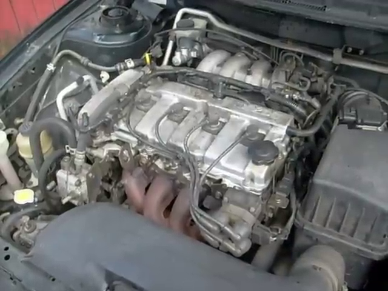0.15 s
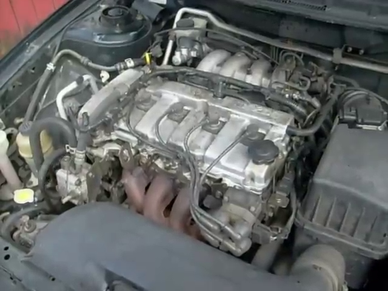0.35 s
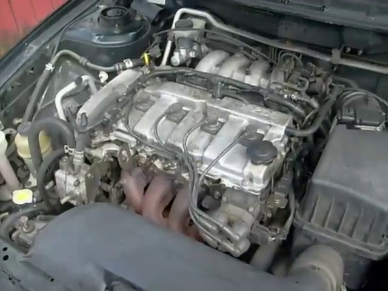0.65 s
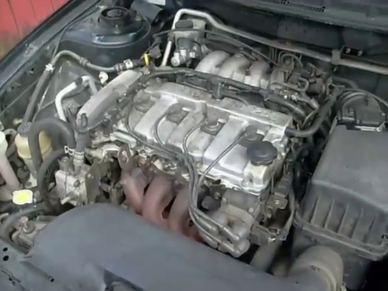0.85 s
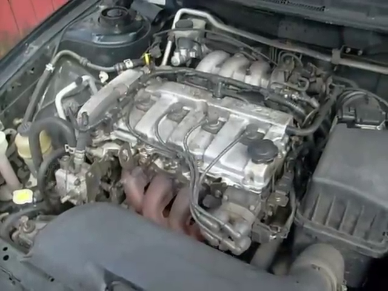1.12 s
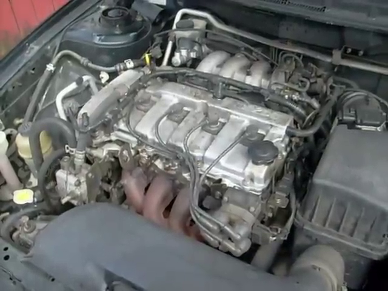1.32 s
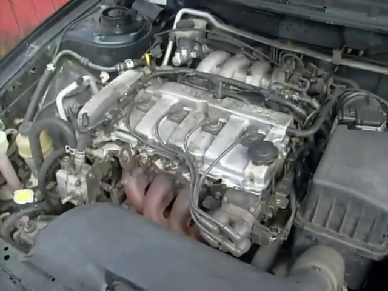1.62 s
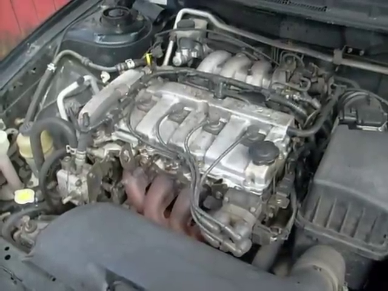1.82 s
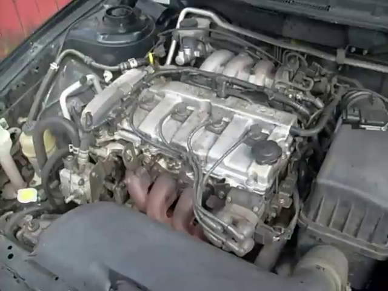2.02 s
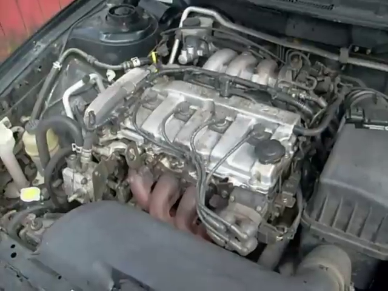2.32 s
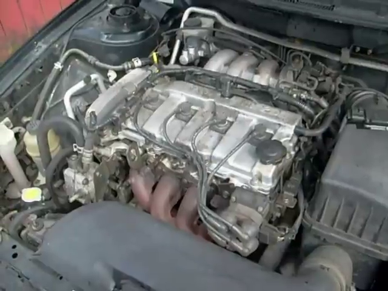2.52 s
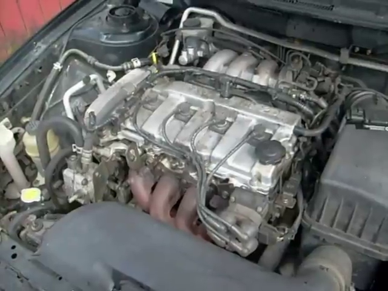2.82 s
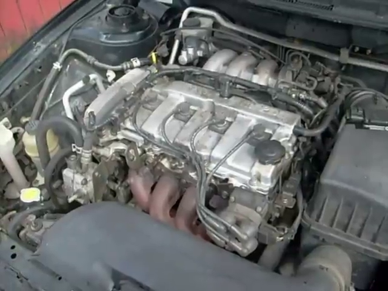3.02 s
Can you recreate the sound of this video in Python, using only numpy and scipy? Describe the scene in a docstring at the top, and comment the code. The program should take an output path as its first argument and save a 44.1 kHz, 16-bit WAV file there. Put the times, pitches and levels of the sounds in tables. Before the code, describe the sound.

A car engine cranks in six grinding pulses, catches with hard metallic knocking, then runs clattering.

```python
"""A starter motor grinds a car engine over six compression strokes in an open bay, close to the microphone.
Gear-tooth clicks ring its housing while the motor groans and the gears whine downward in pitch.
The engine catches with low booms, then blows and their rebounds ring the block as metallic knocks;
its rough clatter speeds up and eases to a fast idle, over firing tones.
Behind it all lie faint yard air and a pump's steady hum; the hardest blows overload the input."""
import sys
import numpy as np
from scipy import signal
from scipy.io import wavfile
from scipy.ndimage import uniform_filter1d

SR = 44100
rng = np.random.default_rng(int(sys.argv[2]) if len(sys.argv) > 2 else 0)


def put_to_file(sound):
    """Save the sound as 16-bit audio at rate SR, in the file named by the first command-line argument."""
    columns = np.atleast_2d(sound).T  # one column per channel
    safe = np.clip(columns, -1, 1)
    whole_steps = np.round(safe * 32767)
    wavfile.write(sys.argv[1], SR, whole_steps.astype(np.int16))


N = 138915  # length in samples

# Spectrum of the quiet yard's air. Each row: frequency in Hz, relative level in dB per Hz.
YARD_SPECTRUM = [(35, -45), (60, -34), (242, -7.5), (804, -19.5), (999, -9.5), (2390, -22), (3460, -10.5),
                 (4600, -38), (11000, -35), (14300, -70), (17000, -95.5)]
# Distant steady hum of a pump. Each row: frequency in Hz, level in dB rms.
PUMP_HUM = [(985.1, -61.5)]
# The starter's load on each compression stroke, with its groan. Each row: start in seconds, hold in seconds,
# drive level in dB, release in dB per second, groan in dB relative to the drive level, groan pitch in Hz.
STROKES = [(.29, 0.1, -16.5, 304, -11, 851), (.484, 0.073, -14.5, 287, -15.5, 866),
           (.667, 0.044, -14, 299, -18, 878), (.808, 0.051, -13, 340, -19, 884),
           (.954, 0.038, -13, 320, -12, 836), (1.094, 0.012, -11.5, 137, -21, 873)]
# Spectrum of the gear grind. Each row: frequency in Hz, relative level in dB per Hz.
GRIND_SPECTRUM = [(40, -46.5), (300, -21), (680, -19.5), (844, -8), (1400, -8.5), (1880, -5), (3190, 5),
                  (4270, -9.5), (5570, -17.5), (9960, -32.5), (13000, -61.5)]
# Resonances of the starter housing. Each row: frequency in Hz, width in Hz, relative level in dB.
HOUSING_MODES = [(2400, 68, -28), (3140, 94, -5), (3450, 28, -10), (4540, 62, -16.5)]
# Clanks of the pinion. Each row: start in seconds, drive level in dB.
CLANKS = [(0.2254, -23), (0.2356, -4), (0.248, -10.5), (0.2586, -9.5), (0.272, -16), (1.1925, -7)]
# Gear whine, sagging as each compression slows the motor.
# Each row: start in seconds, length in seconds, starting pitch in Hz, ending pitch in Hz, level in dB.
WHINES = [(.488, .095, 1640, 1190, -24), (.67, .065, 1830, 1350, -20), (.812, .062, 1830, 1320, -21),
          (.957, .062, 1830, 1370, -22), (1.097, .06, 1830, 1340, -24)]
# Engine speed. Each row: time in seconds, firings per second.
ENGINE_SPEED = [(1.25, 43), (1.35, 46.5), (1.47, 51), (1.6, 54.5), (1.72, 57), (1.95, 57.6), (2.08, 56.2),
                (2.2, 54.2), (2.6, 49.8), (3.0, 46.2), (3.15, 45.2)]
# Drive of the running clatter. Each row: time in seconds, level in dB.
CLATTER_LEVEL = [(1.2, -23), (1.634, -22.5), (3.15, -27.5)]
# Spectrum of the clatter. Each row: frequency in Hz, relative level in dB per Hz.
CLATTER_SPECTRUM = [(41, -84), (70, -29), (200, -21), (369, -20.5), (449, -14.5), (596, -18.5), (1080, -14),
                    (1230, -16.5), (1460, -5.5), (1590, -12), (2690, -4), (3350, 2), (4760, -20),
                    (10400, -36.5), (13000, -77)]
# Resonances of the open bay. Each row: frequency in Hz, width in Hz, relative level in dB.
BAY_MODES = [(1500, 15, -35), (3317, 290, 6.5)]
# Tone at the firing rate. Each row: time in seconds, level in dB rms.
FIRING_TONE = [(1.25, -67), (1.4, -53), (1.7, -51.5), (2.1, -52), (2.6, -57), (3.15, -64)]
# Further engine tones. Each entry: a multiple of the firing rate.
ORDERS = [2, 3, 4, 4.5, 5, 7.5, 9, 10.5]
# Their levels before wavering. Each entry: level in dB rms at 50 firings per second.
ORDER_LEVELS_DB = [-66, -58, -58, -64, -59, -57, -62, -63]
# Low booms as the first firings take. Each row: start in seconds, length in seconds, pitch in Hz, peak in dB rms.
BOOMS = [(1.27, .07, 182, -49), (1.325, .1, 245, -45)]
# Knocks and their rebounds. Each row: start in seconds, drive level in dB, relative drive of the low modes in dB.
KNOCKS = [(1.3485, -1.5, -3), (1.377, -3.5, -7), (1.4298, 3, -5), (1.4428, 0, -5.5), (1.483, -8.5, -11),
          (1.511, 5.5, -10), (1.5221, -4.5, -8), (1.532, -8.5, -1), (1.5876, 7, -12.5), (1.599, 0, -24),
          (1.6075, -2, -7), (1.615, 1, -13), (1.637, -10.5, -0.5), (1.6593, 9.5, -13), (1.6807, 3.5, -9.5),
          (1.6955, -9, -22), (1.729, 10, -15.5), (1.745, 1.5, -18), (1.7576, 1.5, -10), (1.767, -11, -6),
          (1.785, -24, 0), (1.8009, 8, -11), (1.8217, 0, -18), (1.837, -1, -13), (1.87, 8, -9.5),
          (1.8855, 0, -30), (1.8955, 2, -4.5), (1.908, -23, -4), (1.9387, 7, -5), (1.95, -17, -19),
          (1.962, 3.5, -20), (1.968, -7.5, -15), (1.978, -14, -3), (1.9917, -13, -9), (2.0092, 4, -2),
          (2.0232, 2.5, -12), (2.0372, 3, -9.5), (2.0866, -3.5, -6.5)]
# Ringing modes of the engine block. Each row: nominal pitch in Hz, nominal level in dB, 60 dB decay in seconds.
BLOCK_MODES = [(891, -14, .07), (1130, -9, .025), (1635, -3, .022), (1792, -2, .024), (1932, -1, .02),
               (2416, -2, .024), (2930, -12, .035), (3215, -3, .035), (3290, -2, .05), (3382, 1, .042),
               (3560, -5, .035)]
# Spectrum of the crack of each blow. Each row: frequency in Hz, relative level in dB per Hz.
CRACK_SPECTRUM = [(40, -43), (865, -0.5), (1270, 2), (1830, -10), (2830, 10), (3350, 5), (4380, -13),
                  (9960, -51.5), (13000, -39)]

ENGAGE_S, LET_GO_S = 0.2215, 1.1  # the starter begins and lets go


def amp(db):
    """Amplitude for a level in dB."""
    return 10 ** (np.asarray(db) / 20)


def evened(x):
    """The signal scaled to rms 1."""
    return x / np.sqrt(np.mean(x ** 2) + 1e-20)


def colour(x, points):
    """Minimum-phase filter with the given spectrum; white noise keeps its power."""
    f, db = np.transpose(points)
    hz = abs(np.fft.fftfreq(8192, 1 / SR))
    curve_db = np.interp(np.log(hz + 1), np.log(f + 1), np.maximum(db, -100))
    log_gain = np.log(amp(curve_db))
    taps = np.fft.ifft(np.exp(np.conj(signal.hilbert(log_gain)))).real[:4096]
    return signal.oaconvolve(x, taps / np.linalg.norm(taps))[:len(x)]


def resonate(x, hz, width):
    """A resonance that follows hz, width in Hz; noise of rms 1 comes out near rms 1."""
    turn = np.exp(2j * np.pi * np.cumsum(hz * np.ones(len(x))) / SR)
    r = np.exp(-np.pi * width / SR)
    # shift the pitch down to zero, smooth there, and shift back up
    smooth = signal.lfilter([np.sqrt(2 * (1 - r * r))], [1, -r], x / turn)
    return (turn * smooth).real


def ring_modes(drive, modes):
    """One drive rings every (Hz, width Hz, dB) resonance at once."""
    return sum(amp(db) * resonate(drive, hz, width) for hz, width, db in modes)


def grains(per_s, spread_db):
    """Random clicks of either sign at rms 1; a positive spread makes a few large, a negative one a few small."""
    draw = rng.random((N, 2))
    spread = np.minimum(-np.log(draw[:, 0] + 1e-9), 5)
    size = amp(spread_db * spread) * np.sign(rng.standard_normal(N))
    happens = np.clip((per_s / SR - draw[:, 1]) * 400 + .5, 0, 1)
    return evened(size * happens)


def bursts(rows, t60):
    """Envelope: a 2.6 ms rise and an exponential fall for each (s, dB), 60 dB down after t60 seconds."""
    t, env = np.arange(N) / SR, np.zeros(N)
    for s, db in rows:
        env += np.clip((t - s) / 0.0026, 0, 1) * amp(db - 60 * np.maximum(t - s, 0) / t60)
    return env


def yard():
    """Faint air, as coloured noise, and a pump's hum, as a steady sine."""
    t = np.arange(N) / SR
    hum = sum(np.sqrt(2) * amp(db) * np.sin(2 * np.pi * hz * t) for hz, db in PUMP_HUM)
    air = amp(-57.5) * colour(rng.standard_normal(N), YARD_SPECTRUM)
    return air + hum


def starter():
    """Gear teeth chatter through the housing, hardest under load, and the motor groans."""
    first_rise_s, rise_s, sag_db = 0.02, 0.0014, -2.5  # sag over each hold
    first_groan_lead_s, groan_width_hz = 0.031, 58
    t = np.arange(N) / SR
    teeth = grains(6000, -0.5)
    chatter = mesh()
    groan_hz = np.interp(t, *np.transpose(STROKES)[[0, -1]])
    load, groan = np.zeros((2, N))
    for k, (s, hold, db, fall_db, groan_db, _) in enumerate(STROKES):
        u = np.clip((t - s) / hold, 0, 1)
        after = np.maximum(t - s - hold, 0)
        rise = np.clip((t - s) / (rise_s if k else first_rise_s), 0, 1)
        load += rise * amp(db + sag_db * u - fall_db * after)
        lead = 0 if k else first_groan_lead_s
        groan_rise = np.clip((t - s + lead) / 0.0026, 0, 1)
        groan += groan_rise * amp(db + groan_db - fall_db * after)
    fade_out = np.clip((LET_GO_S - t) / 0.031, 0, 1)
    coast = amp(-27.5) * np.clip((t - ENGAGE_S) / 0.0021, 0, 1) * fade_out
    clanks = bursts(CLANKS, t60=0.045)
    drive = teeth * (load * chatter + coast + clanks)
    rings = ring_modes(drive, HOUSING_MODES)
    # two resonances in a row give a narrow, rough tone
    rough = resonate(teeth, groan_hz, 2 * groan_width_hz)
    groan *= evened(resonate(rough, groan_hz, groan_width_hz))
    return colour(drive, GRIND_SPECTRUM) + amp(-1) * rings + whine(chatter) + groan


def mesh():
    """Uneven bites of the pinion's teeth, in clumps: a sudden grip that dies before the next."""
    bites_per_s, depth, fall = 115, .62, .45  # mean rate; share of the level; decay in bite lengths
    wander = uniform_filter1d(rng.standard_normal(N), size=200)
    bites = np.cumsum(bites_per_s * (1 + 4 * wander)) / SR
    size = amp(2.5 * rng.standard_normal(800))[bites.astype(int)]
    grip = uniform_filter1d(size * np.exp(-(bites % 1) / fall), size=110)
    return evened(1 - depth + depth * evened(grip))


def whine(chatter):
    """Gear whine: a rough tone and its noisy third harmonic, sliding down as compression slows the motor."""
    clean, glide, third_db = .45, 1.1, -12  # share of pure tone; glide speed; third harmonic in dB
    t, fuzz, out = np.arange(N) / SR, rng.standard_normal(N), np.zeros(N)
    for s, length, from_hz, to_hz, db in WHINES:
        u = np.clip((t - s) / length, 0, 1)
        hz = from_hz + (to_hz - from_hz) * np.sin(np.pi / 2 * np.clip(u * glide, 0, 1))
        pure = np.sqrt(2) * np.sin(2 * np.pi * np.cumsum(hz) / SR)
        tone = clean * pure * np.sqrt(chatter)
        tone += (1 - clean) * resonate(fuzz, hz, 60.)
        third = resonate(resonate(fuzz, 3 * hz, 150.), 3 * hz, 60.)
        tone += amp(third_db) * evened(third)
        swell = np.sqrt(4 * u * (1 - u))
        out += amp(db) * swell * tone
    return out


def engine():
    """Valve-gear clatter throbs with each firing over the firing tone and its wavering multiples."""
    throb_depth, throb_fall = 0.094, 0.13  # share of the level; decay in firing lengths
    waver_db, growth_db = 1.8, .9  # spread of each multiple; growth per firing per second
    t = np.arange(N) / SR
    speed = np.interp(t, *np.transpose(ENGINE_SPEED))
    firings = np.cumsum(speed) / SR
    on = np.clip((t - LET_GO_S) / 0.031 + 1, 0, 1)  # fades in as the starter fades out
    strength = amp(2.5 * rng.standard_normal(400))[firings.astype(int)]
    pulse = np.exp(-((firings + .3) % 1) / throb_fall)
    throb = evened(1 - throb_depth + throb_depth * strength * pulse * 2)
    drive = grains(5500, -0.5) * throb
    rings = ring_modes(drive, BAY_MODES)
    level = amp(np.interp(t, *np.transpose(CLATTER_LEVEL)))
    clatter = level * (colour(drive, CLATTER_SPECTRUM) + amp(-11.5) * rings)
    tones = amp(np.interp(t, *np.transpose(FIRING_TONE))) * np.sin(2 * np.pi * firings)
    for order, db in zip(ORDERS, ORDER_LEVELS_DB):
        waver = waver_db * np.interp(t, np.linspace(0, N / SR, num=30), rng.standard_normal(30))
        order_level = amp(db + waver + growth_db * (speed - 50))
        tones += order_level * np.sin(2 * np.pi * (order * firings + rng.random()))
    for s, length, hz, db in BOOMS:
        swell = np.sin(np.pi * np.clip((t - s) / length, 0, 1))
        tones += amp(db) * swell * np.sin(2 * np.pi * hz * t)
    return on * (clatter + np.sqrt(2) * tones)


def knocks():
    """Each blow is a strike, a short scuffle and a loose rattle that ring the block; the low modes vary by blow."""
    low_modes_hz, strike_db, rattle_db = 2200, 14.5, -17
    vary_db, detune = 1.6, .02  # every blow lands elsewhere: spread of each mode's level and pitch
    s, db, low_db = np.transpose(KNOCKS)
    noise, rattle, out = rng.standard_normal(N), grains(1220.0, 2.26), np.zeros(N)

    def blow_drive(scuffle_db, hit_db):
        """Noise, rattling clicks and one impulse per blow."""
        x = noise * bursts(zip(s, scuffle_db), t60=.018)
        x += rattle * bursts(zip(s, scuffle_db + rattle_db), t60=0.19)
        np.add.at(x, np.round(s * SR).astype(int) + 20, amp(hit_db + strike_db))
        return x

    high_drive = blow_drive(db, db)
    low_drive = blow_drive(db + low_db + 6.5, db + low_db + 8.5)
    latest = np.searchsorted(s, np.arange(N) / SR) - 1  # the blow now ringing
    chance = rng.standard_normal((len(s), len(BLOCK_MODES), 2))
    for k, (hz, mode_db, t60) in enumerate(BLOCK_MODES):
        louder, sharper = chance[latest, k].T
        drive = low_drive if hz < low_modes_hz else high_drive
        x = drive * amp(mode_db + vary_db * louder)
        width = np.log(1000) / np.pi / t60
        out += (-1) ** k * resonate(x, hz * (1 + detune * sharper), width)  # modes alternate in sign
    crack = colour(high_drive, CRACK_SPECTRUM)
    return amp(-2.5) * (amp(-9.5) * out + amp(-8.0) * crack)


def scene():
    """All sources at one microphone; the starter and knocking metal radiate little bass."""
    less_bass = signal.butter(2, 149, "high", fs=SR, output="sos")
    metal = signal.sosfilt(less_bass, starter() + knocks())
    return (yard() + metal + engine())[None]


def record(dry):
    """The microphone loses the top; the input overloads at a hard knee; then the band limit."""
    clip_at, knee = .7, 24  # ceiling in full scale; sharpness of its corner
    dull = signal.sosfilt(signal.butter(8, 9780, fs=SR, output="sos"), dry)
    clipped = dull / (1 + abs(dull / clip_at) ** knee) ** (1 / knee)
    soft = signal.sosfilt(signal.butter(4, 10500, fs=SR, output="sos"), clipped)
    band_limit = signal.firwin(511, 15900, window=("kaiser", 9), fs=SR)
    return signal.oaconvolve(soft, band_limit[None], "same")


dry = scene()
out = record(dry)
put_to_file(out)
```